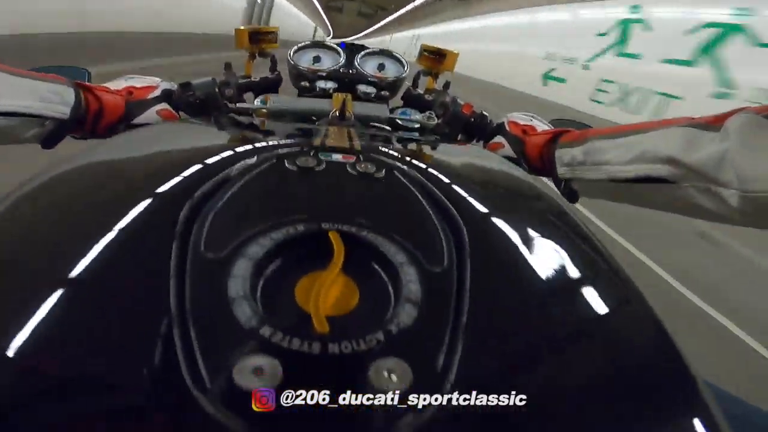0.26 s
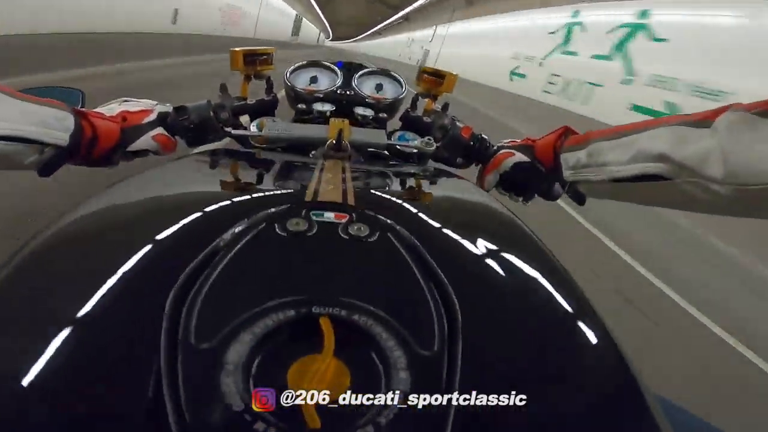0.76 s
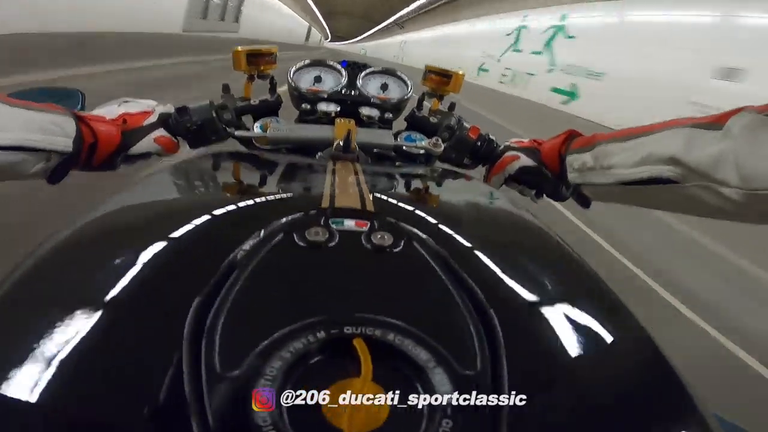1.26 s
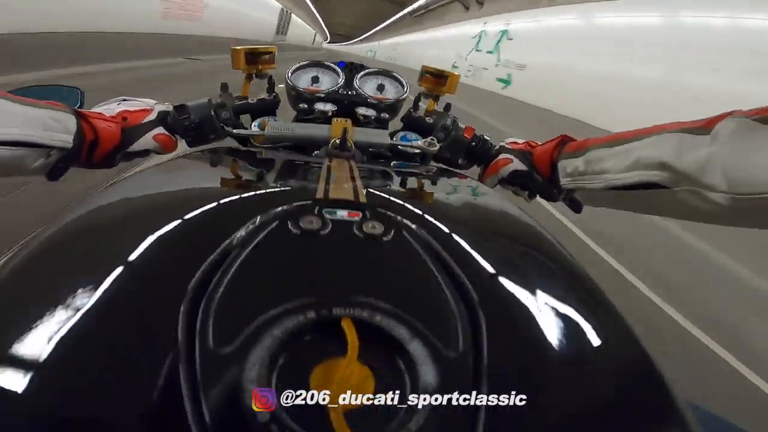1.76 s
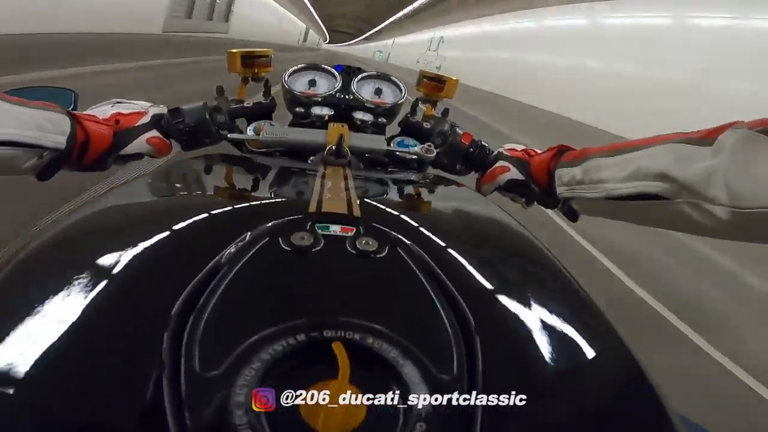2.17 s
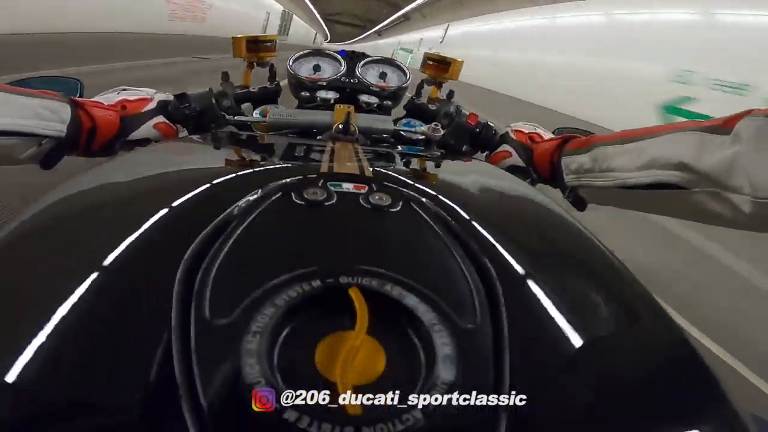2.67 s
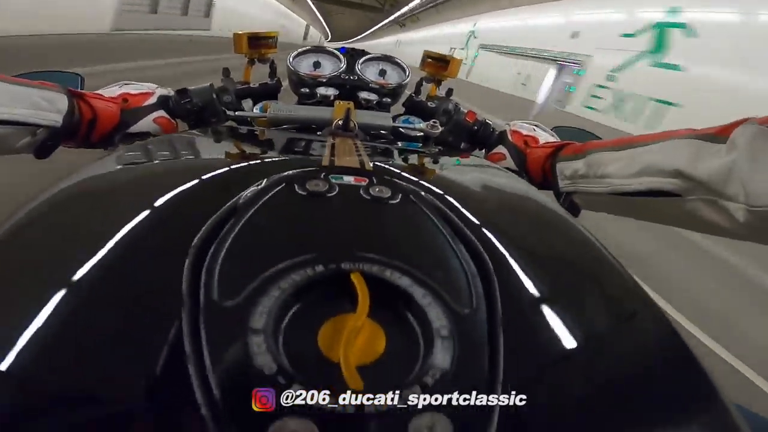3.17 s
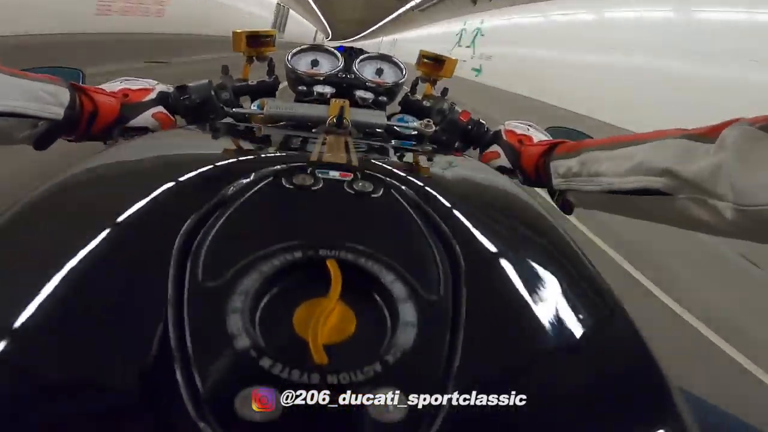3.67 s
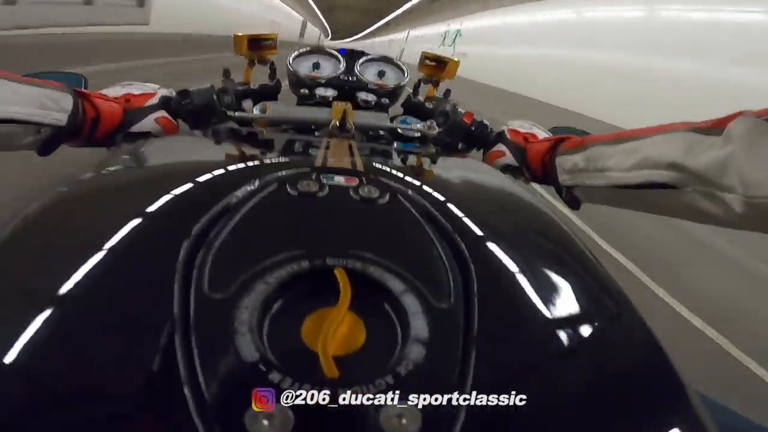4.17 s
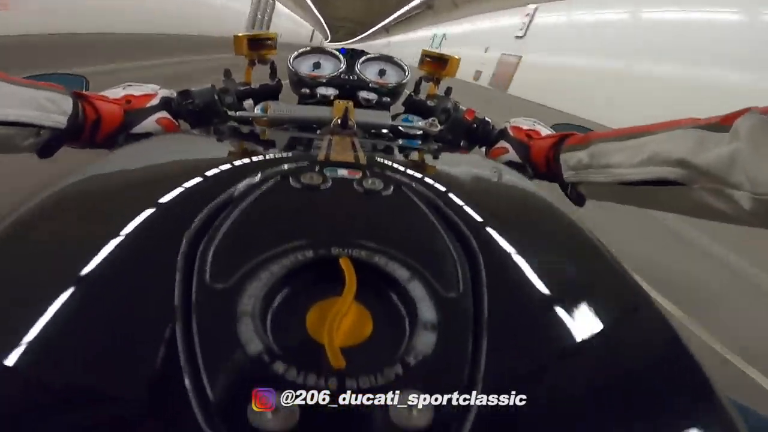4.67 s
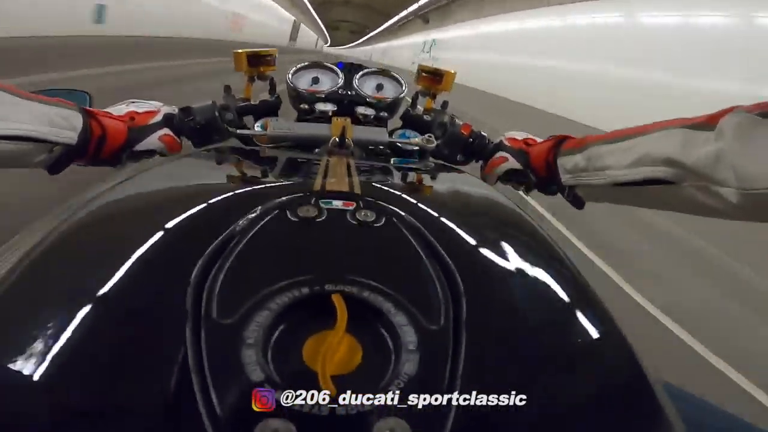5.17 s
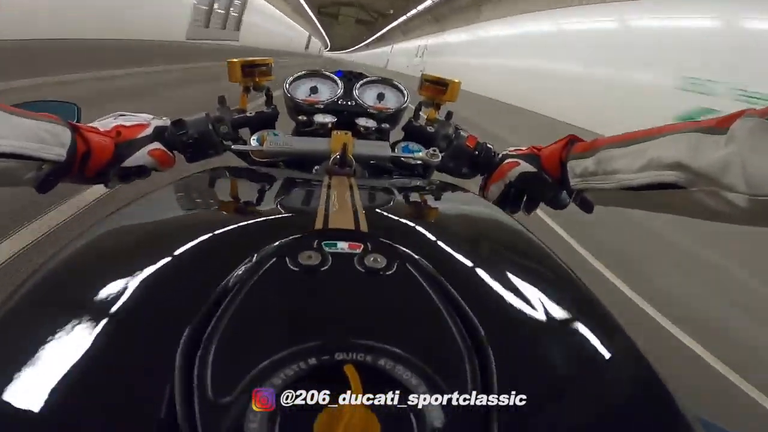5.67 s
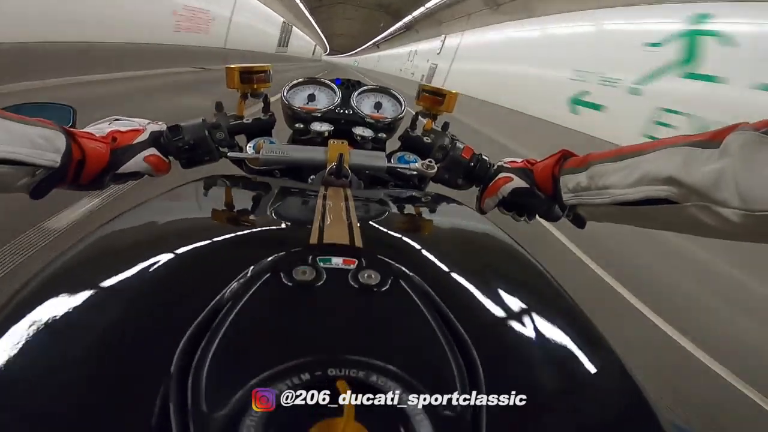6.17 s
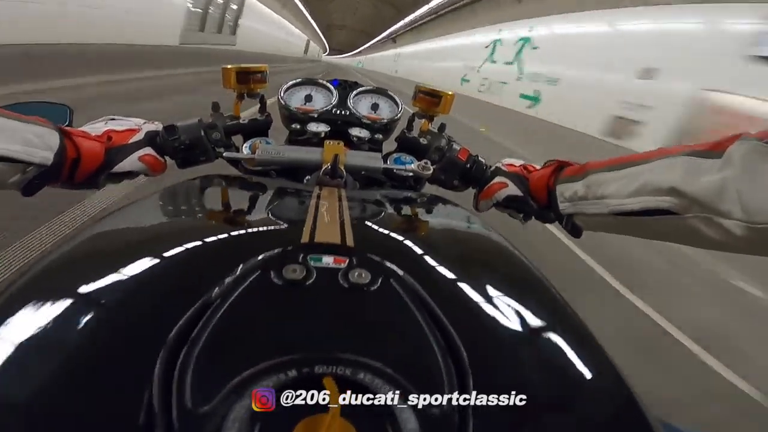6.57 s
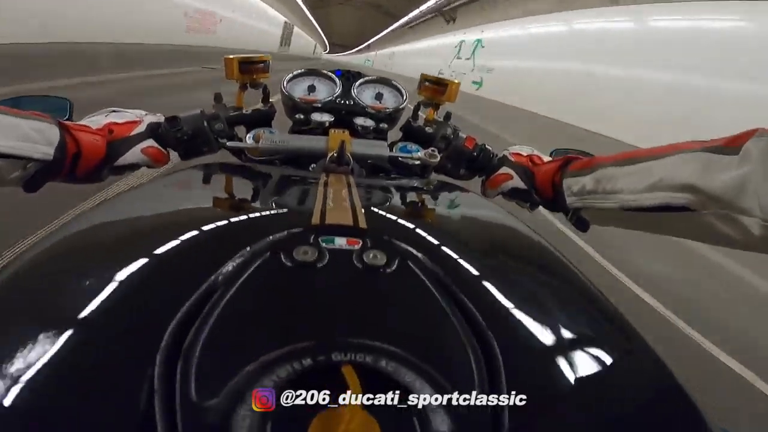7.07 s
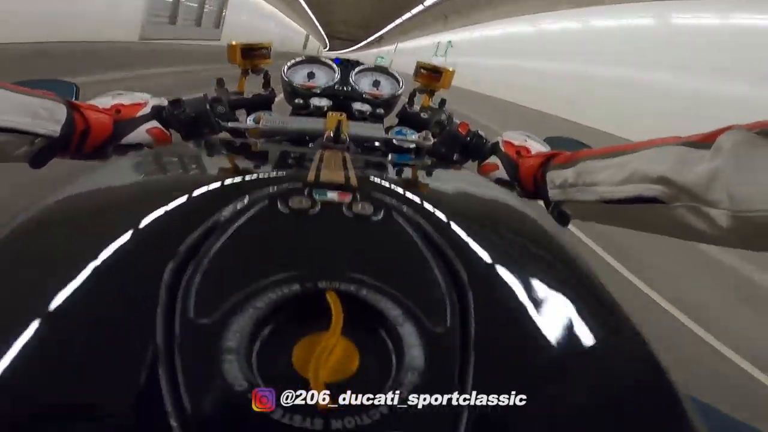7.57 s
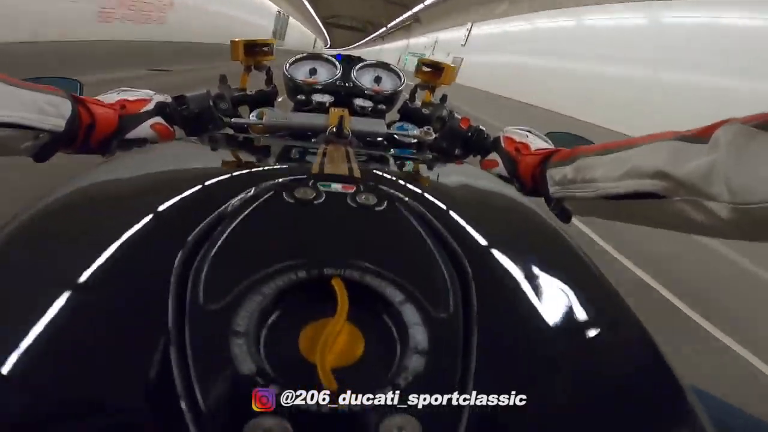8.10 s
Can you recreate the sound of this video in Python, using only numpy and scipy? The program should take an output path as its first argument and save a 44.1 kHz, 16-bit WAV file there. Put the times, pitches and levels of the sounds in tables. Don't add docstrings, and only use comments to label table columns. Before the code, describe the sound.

A twin-cylinder motorcycle runs through a hard-walled road tunnel, heard close from its tank through a muffled microphone. It starts already under throttle, barking and rising slightly, until about 0.55 s, when the throttle snaps shut and the sound turns darker, a hollow hum sinking gradually in pitch until 2.6 s. Then the throttle opens: rough, buzzing exhaust with crackling hard firings, especially 2.8-4 s, climbing about two semitones until 5.3 s, with a 200 Hz tunnel boom blooming from 3.3 s and fading. The throttle shuts; the bark chokes and the drone sags until 7.2 s. A final rasping pull climbs, booms again from 7.8 s and cuts off at 8.3 s still accelerating. Low lumpy wind gusts persist, strongest around 5.2-5.8 s. Walls make tones waver; dull loose-part ticks occur sporadically, sharpest near 3.2 and 7.1 s.

```python
import sys
import numpy as np
from scipy import signal
from scipy.fft import rfft, irfft
from scipy.io import wavfile
from scipy.ndimage import uniform_filter1d

SR = 44100
rng = np.random.default_rng(int(sys.argv[2]) if len(sys.argv) > 2 else 0)


def attenuation_scalar(level_db):
    decades = np.asarray(level_db, float) / 20
    return 10 ** decades


def digitize_waveform(pressure):
    field = np.atleast_2d(pressure).T
    bounded = np.clip(field, -1, 1)
    quanta = np.round(bounded * 32767).astype(np.int16)
    wavfile.write(sys.argv[1], SR, quanta)


N = 367794
T = np.arange(N) / SR

# start of opening in seconds, start of shutting in seconds.
THROTTLE_ROWS = [
    (-1, .54),
    (2.6, 5.31),
    (7.23, 9.5),
]
SECOND_FIRING_CYCLES, SECOND_FIRING_DB = .63, -5


def evened(x):
    return x / np.sqrt(np.mean(x ** 2) + 1e-20)


def curve(rows):
    s, value = np.transpose(rows)
    return np.interp(T, s, value)


def bumps(rows, width_s):
    return sum(db * np.exp(-((T - s) / width_s) ** 2) for s, db in rows)


def drift(hz):
    z = rfft(rng.standard_normal(N))
    return evened(irfft(z * np.exp(-(np.fft.rfftfreq(N, 1 / SR) / hz) ** 2), N))


def noise(points, patchy_db, size):
    hz = np.fft.rfftfreq(size, 1 / SR)
    a, b, patches = rng.standard_normal((N * 4 // size + 5, len(hz), 3)).T
    patches = uniform_filter1d(patches, size=8, axis=0)
    patches = evened(uniform_filter1d(patches, size=8, axis=1))
    f, db = np.transpose(points)
    colour_db = np.interp(np.log(hz + 1), np.log(f + 1), db, left=-90, right=-120)[:, None]
    z = (a + 1j * b) * attenuation_scalar(colour_db + patchy_db * patches)
    return evened(signal.istft(z, nperseg=size, noverlap=size * 3 // 4)[1][:N])


def butter(n, hz, kind):
    return signal.butter(n, hz, kind, fs=SR, output="sos")


def throttle():
    roll_on_s, snap_shut_s = .16, .08
    out = np.zeros(N)
    for on, shut in THROTTLE_ROWS:
        out += np.clip((T - on) / roll_on_s, 0, 1) * np.clip(1 - (T - shut) / snap_shut_s, 0, 1)
    return out


def cycle_rate():
    # time in seconds, rate in cycles per second.
    speed_rows = [(0, 55.6), (.49, 56.7), (.6, 56.2), (.65, 54.2), (.76, 55.4), (2.11, 50.65), (2.42, 49.9),
                  (3, 50.3), (3.92, 53.65), (4.71, 55.55), (5.06, 56.15), (5.32, 56.3), (5.39, 55),
                  (5.6, 54.9), (6.88, 50.3), (7.2, 49.95), (7.55, 50.25), (8.34, 52.95)]
    return curve(speed_rows)


def engine_load():
    # time in seconds, load from 0 to 1.
    load_rows = [(0, 0.87), (.5, 0.38), (.62, 0.14), (2.55, 0.14), (2.8, 0.58), (3.2, 0.78), (5.25, 0.26),
                 (5.42, 0), (7.2, 0.08), (7.45, 0.59), (8.34, 0.93)]
    lag_s = .18
    load = np.clip(curve(load_rows), 0, 1)
    return load, np.interp(T - lag_s, T, uniform_filter1d(load, size=SR // 4))


def swells(k):
    # time in seconds, order, level in dB.
    swell_rows = [(.1, 4, -8), (.5, 4, 6), (.5, 6, -1.5), (.72, 4, -4), (0.61, 6, -1), (1.05, 4, -6),
                  (1.7, 3, 3.5), (1.9, 5, 4), (1.91, 6, -2.5), (2.03, 4, -3.5), (2.34, 3, 5), (2.5, 6, -9),
                  (2.95, 6, -5), (2.3, 5, 3), (3.2, 3, 3), (3.4, 6, -7), (4.9, 8, 13), (5.15, 6, -1.5),
                  (5.3, 6, -8.5), (4.9, 5, -10), (5.7, 6, 3.5), (5.799, 4, -8.5), (5.7, 5, -6.5),
                  (9.4, 3, 4), (6.3, 4, 5.5), (6.55, 6, -10.5), (6.5, 5, -2.5), (6.75, 6, -4.5),
                  (8.4, 3, -1), (6.5, 6, -7), (7.3, 5, 6.5), (8.9, 6, -13), (7.8, 6, -5), (8, 8, -0.5),
                  (8.1, 5, 6), (0.26, 8, -4), (1.101, 5, 5), (7.9, 3, 5.5), (3.3, 4, -1), (3, 7, 5),
                  (3.25, 7, 8.5), (7.6, 7, 8.5), (7.8, 7, 11), (3.2, 9, 3), (7.55, 9, 4), (7.9, 9, 2.5),
                  (8.1, 9, 9), (1, 9, 5.5), (7.1, 9, 2.5), (3.2, 5, 4.5), (3.2, 8, 0.5), (3.4, 7, 2),
                  (2.83, 11, -8.5), (2.8, 11, -0.5), (7.8, 11, -4.5), (3.9, 10, 7), (5.7, 10, 7),
                  (2.35, 8, 2.5), (1.6, 6, -1)]
    # time in seconds, order, level in dB.
    lift_rows = [(2.5, 11, -9.5), (7.05, 11, -7), (7.3, 11, -7.5), (3.4, 14, -14), (2.8, 15, -10),
                 (2.8, 19, -4.5), (2.8, 21, -10), (7.6, 21, -3.5), (2.6, 12, 1.5), (.8, 2, 6.5),
                 (3.9, 1, 4), (4.3, 1, 5), (2.9, 1, -4), (5.6, 1, -3), (7, 1, -4.5), (4.6, 13, -9),
                 (2.8, 13, -5.5), (3.4, 16, -8), (4.8, 16, -5), (0.093, 15, 7), (0.32, 16, 4.5),
                 (.1, 17, 4), (.1, 7, -6), (.4, 9, -7), (3.3, 7, 3), (3.7, 7, 6), (.1, 19, -5),
                 (.4, 19, -7), (.4, 18, 4), (4, 18, 4), (4.3, 19, -1), (4.6, 16, 4), (5.4, 13, -3),
                 (4.3, 14, -3), (4, 14, 3.5), (3.1, 23, 7.5), (3.4, 23, 8), (4.3, 23, 7), (7.9, 23, 8),
                 (4.9, 21, 5), (5, 20, 4), (7.3, 20, 6.5), (7.6, 12, 4.5), (8, 9, -5), (5.5, 9, 3),
                 (2.55, 3, -2), (3.5, 4, 3.5), (3.72, 4, 5), (3.9, 4, 2), (.64, 4, 4), (7.15, 3, -3),
                 (6.35, 6, 2), (3.75, 6, 1), (2.4, 5, 1.5), (5.9, 5, -2.5), (8, 4, 1), (8.2, 4, 3),
                 (7.9, 8, 1), (1.3, 6, 1.5), (.85, 6, 1.5)]
    rows = [(s, db) for s, multiple, db in swell_rows + lift_rows if round(multiple) == k]
    return bumps(rows, width_s=.1)


def order(turns, k, wobble_db, wobble_rad):
    k = round(k)
    place, db = SECOND_FIRING_CYCLES, SECOND_FIRING_DB
    if k > 8:
        place, db = .65, -4
    lead_cycles = .045
    phase = np.angle(1 + attenuation_scalar(db) * np.exp(-2j * np.pi * k * place))
    phase += 2 * np.pi * lead_cycles * max(k - 9, 0)
    phase += np.pi / 2 if 5 <= k <= 7 else .25
    phase += .15 * rng.standard_normal()
    level = np.sqrt(2) * attenuation_scalar(wobble_db * drift(hz=8.8))
    return level * np.cos(2 * np.pi * k * turns + phase + wobble_rad * drift(hz=5.9))


def lope(turns, hz, load):
    # order, level in dB throttle shut, level in dB throttle open.
    lope_rows = [(1, -34, -26.5), (2, -37.5, -26.5)]
    out = np.zeros(N)
    for k, shut_db, open_db in lope_rows:
        level_db = shut_db + load * (open_db - shut_db) + swells(k) + .5 * (hz - 51.5)
        out += attenuation_scalar(level_db) * order(turns - .08, k, .98, .16)
    return out


def thud(turns, hz):
    # order, level in dB throttle shut, level in dB throttle open, lag in cycles.
    thud_rows = [(3, -26, -33, .08), (4, -27, -36, .045), (5, -31.5, -31.5, 0), (6, -30.5, -29.5, 0),
                 (8, -43, -31.5, .012)]
    # centre in Hz, width in Hz, lift in dB throttle shut, lift in dB open.
    tunnel_rows = [(149.6, 1.2, -6, 4), (152.6, 1.7, 7.5, 2), (200, 5.2, 8, 21), (203.3, 1.8, -1, 4),
                   (299.5, 3.8, -7, -8), (312, 10, 5.5, 1), (164, 3, 2, -1), (226, 5, 4, 12),
                   (251, 4, -6, -4), (268, 5, 7, 3), (282, 4, 1, 2), (339, 3.5, 1, 6), (402, 4.5, 5, 9),
                   (444, 6, 3, 1)]
    # time in seconds, level in dB.
    recess_rows = [(.68, -0.5), (.93, 0), (1.08, -4), (1.44, -2.5), (1.62, -1), (2.55, -1), (4.56, -1),
                   (4.96, -19.5), (5.5, 1), (6.22, -1.5), (6.57, 1.5), (7.2, 1)]
    edge, recess_s, wall_db = 3, .12, .6
    out, opened = np.zeros(N), throttle()
    for k, shut_db, open_db, lag in thud_rows:
        k = round(k)
        lift_db = np.zeros(N)
        for peak_hz, width_hz, low_db, high_db in tunnel_rows:
            near = np.exp(-abs((k * hz - peak_hz) / width_hz) ** edge)
            lift_db += (low_db + opened * (high_db - low_db)) * near
        sway_db = wall_db * drift(hz=14.0) + bumps(recess_rows, recess_s)
        sway_db = attenuation_scalar(-np.maximum(lift_db, 0) / 2) * sway_db + swells(k)
        level_db = shut_db + opened * (open_db - shut_db) + lift_db + sway_db
        out += attenuation_scalar(level_db) * order(turns - lag, k, .6, .12)
    return out


def bark_level_db(hz, load):
    shut_db, open_db, load_db, coast_db_per_hz = -39, -33.5, 7, .8
    gulp_db, gulp_s = -7, .17
    opened = throttle()
    gulp = sum(np.exp(-((T - shut - gulp_s) / gulp_s) ** 2) for on, shut in THROTTLE_ROWS)
    level_db = shut_db + opened * (open_db - shut_db + load_db * load) + gulp_db * gulp
    return level_db + coast_db_per_hz * (1 - opened) * (hz - hz.mean())


def bark(turns, hz, load, late_load):
    # level in dB throttle shut, level in dB throttle open.
    bark_rows = [(-5, -14), (0, -14), (-2, -27.5), (-2.5, -1.5), (-2.5, -0.5), (-12, -14.5), (-6.5, -16.5),
                 (-15, -18), (-19, -14.5), (-15.5, -13), (-17, -22), (-18, -16.5), (-21, -12.5),
                 (-23, -14.5), (-23.5, -19), (-24, -21), (-29.5, -31), (-27, -24), (-23, -35), (-29, -35),
                 (-29.5, -21.5)]
    # centre in Hz, width in Hz, lift in dB.
    lift_rows = [(526, 19, -10.5), (690, 17, 0.5), (757, 51, 7.5), (954, 30, 10.5), (1124, 20, 6.5)]
    bloom_db, coast_top_db = -11.5, -5
    out, opened = np.zeros(N), throttle()
    firing_db = bark_level_db(hz, load) + .6 * drift(hz=40.)
    for k, (shut_db, open_db) in zip([7, *range(9, 29)], bark_rows):
        lift = sum(db * np.exp(-((k * hz - peak_hz) / width_hz) ** 2) for peak_hz, width_hz, db in lift_rows)
        pipe_db = load * lift
        if k > 12:
            pipe_db += bloom_db * np.maximum(load - late_load, 0) + coast_top_db * (1 - opened)
        level_db = firing_db + shut_db + load * (open_db - shut_db) + pipe_db + swells(k)
        out += attenuation_scalar(level_db) * order(turns - .012, k, .05 * k, .0007 * k * k)
    return out


def puffs(turns, second_db, fade_cycles, spread_db):
    strength = attenuation_scalar(spread_db * rng.standard_normal((500, 2)))
    out = np.zeros(N)
    for k, (place, db) in enumerate([(0, 0), (SECOND_FIRING_CYCLES, second_db)]):
        u = turns + 1.04 - place
        out += attenuation_scalar(db) * strength[u.astype(int), k] * np.exp(-(u % 1) / fade_cycles)
    return uniform_filter1d(out, size=150)


def roar(turns, hz, load, hiss_db):
    # frequency in Hz, density in dB per Hz.
    roar_rows = [(88, -41), (150, 2), (253, -13), (315, -4), (371, -9.5), (609, -15), (802, -16),
                 (1430, -24.5), (4000, -46), (5200, -82.5), (8800, -120)]
    gate = .9 - .25 * load + (.3 + .6 * load) * puffs(turns, -3, .11, 1.6)
    level_db = -27.0 + .26 * (hiss_db + 50.0) + .21 * load
    out = attenuation_scalar(level_db) * noise(roar_rows, 1.6, size=1024) * gate
    rasp = .51 * (load - .3) + .073 * (1 - throttle()) * (hz - 53.5)
    return out + rasp * signal.sosfiltfilt(butter(2, (756, 1490), "band"), out)


def flares():
    # time in seconds, level in dB.
    flare_rows = [(.0702, 0.5), (0.1222, 1), (0.1964, -17), (0.249, 4), (0.4246, 7), (2.8225, 0),
                  (2.8435, 4.5), (2.8844, 4), (3.021, 2), (3.0642, 5), (3.1224, 4), (3.142, 4), (3.162, 0),
                  (3.181, 4), (3.204, 7), (3.2241, 6), (3.259, 2), (3.375, 5), (3.4326, 1), (3.5082, 0),
                  (3.5483, -1.5), (3.5865, -6), (3.6244, -2), (3.777, 4), (3.8108, 2), (3.8686, 9),
                  (3.9806, -1.5), (4.018, 1.5), (4.4577, -1.5), (4.7292, -2), (5.0697, 3), (7.6023, 4),
                  (7.683, 0.5), (7.7423, 0), (7.7814, 0), (7.821, 0.5), (7.8565, -0.5), (7.919, -1),
                  (7.995, -8), (8.036, 6), (8.0906, 6), (8.1472, 4), (8.186, 1.5), (8.2112, -1),
                  (8.2224, 0), (8.2825, -7), (8.3199, -2)]
    fade_s = .0028
    out = np.zeros(N)
    for s, db in flare_rows:
        out[round(s * SR)] = attenuation_scalar(db - .5)
    out = signal.oaconvolve(out, np.exp(-np.arange(1000) / SR / fade_s))[:N]
    return uniform_filter1d(uniform_filter1d(out, size=60), size=60)


def hiss(turns, load, hiss_db):
    # frequency in Hz, density in dB per Hz.
    hiss_rows = [(700, -28.5), (1200, -2), (1600, -11.5), (1900, -9), (2350, -12.5), (2800, -15.5),
                 (3600, -18.5), (5000, -25.5), (6400, -32), (8000, -42), (10000, -59), (12500, -66.5),
                 (14500, -77.5)]
    gate = 1 - .5 * load + 1.05 * load * puffs(turns - .04, 10, .16, 1.6)
    gate /= np.sqrt(uniform_filter1d(gate ** 2, size=4000))
    jet = noise(hiss_rows, .65, size=256)
    crackle = jet + .8 * signal.sosfilt(butter(2, 3800, "high"), jet)
    return attenuation_scalar(hiss_db + 4.5) * (jet * gate + crackle * flares())


def panels(x):
    # centre in Hz, width in Hz, share throttle shut, share throttle open.
    panel_rows = [(1373, 51, 0.53, 0.092), (2280, 80, .3, 0.73), (2400, 44, 0.93, .3),
                  (3010, 140, 0.48, 0.43), (3660, 64, .1, 0.54)]
    out, opened = x.copy(), throttle()
    for hz, width_hz, shut, wide in panel_rows:
        out += (shut + opened * (wide - shut)) * signal.lfilter(*signal.iirpeak(hz, hz / width_hz, SR), x)
    return out


def engine():
    hz = cycle_rate()
    turns = .75 + np.cumsum(hz) / SR
    load, late_load = engine_load()
    hiss_db = -53 + .42 * (hz - hz.min()) + 7.5 * late_load
    tone = lope(turns, hz, load) + thud(turns, hz) + bark(turns, hz, load, late_load)
    return tone + panels(roar(turns, hz, load, hiss_db) + hiss(turns, load, hiss_db))


def microphone_hiss():
    # frequency in Hz, density in dB per Hz.
    air_rows = [(5000, -3), (8000, 0), (11000, -7), (13000, -22.5)]
    return attenuation_scalar(-81.5) * noise(air_rows, .3, size=256)


def wind():
    # frequency in Hz, density in dB per Hz.
    wind_rows = [(14, -44.5), (26, -15.5), (40, -5.5), (60, -1.5), (90, -1), (130, -5.5), (200, -11),
                 (400, -23)]
    # time in seconds, level in dB.
    gust_rows = [(.3, 0), (.84, 0.5), (1, 1.5), (1.85, 3), (2.11, -2.5), (2.35, -1.5), (2.93, 5.5),
                 (3.14, -3), (3.38, -6), (3.52, 1), (3.8, 0), (4.28, 1), (4.68, 3.5), (4.97, 4), (5.18, 8),
                 (5.78, 7.5), (6.21, 3), (6.53, 1.5), (6.68, 1.5), (6.95, 3), (7.39, 4), (7.88, 3),
                 (8.1, 1.5), (8.3, 2)]
    shut_db, open_db, gust_s = -24, -26, .057
    level_db = shut_db + throttle() * (open_db - shut_db) + bumps(gust_rows, gust_s)
    level_db += 1.2 * drift(hz=3.0) + .2 * drift(hz=18.0)
    return attenuation_scalar(level_db) * noise(wind_rows, .43, size=4096)


def ticks():
    # time in seconds, peak in dB.
    tick_rows = [(2.822, -29), (2.8445, -31), (3.2045, -22), (3.225, -27), (7.0884, -17), (7.4227, -29),
                 (1.912, -27), (1.123, -27), (6.047, -30), (6.237, -30), (6.6583, -32), (8.0385, -25),
                 (4.0185, -27)]
    out, t = np.zeros(N + 400), np.arange(400) / SR
    dull = np.vstack([butter(1, 500, "high"), butter(2, 1400, "low"), butter(3, 4800, "low")])
    for s, db in tick_rows:
        snap = 3.5 * (t == 0) + rng.standard_normal(400)
        snap = signal.sosfilt(dull, snap * attenuation_scalar(-60 * t / .006))
        out[round(s * SR):][:400] += attenuation_scalar(db - .5) * snap / abs(snap).max()
    return out[:N]


def boom():
    # start in seconds, length in seconds, level in dB.
    boom_rows = [
        (3.27, 1.6, -22),
        (7.836, 0.49, -21.5),
    ]
    boom_hz, fade_db_per_s, waver_db = 200.4, -9, 2
    out = np.zeros(N)
    for start, length, db in boom_rows:
        fade = np.clip((T - start) / .061, 0, 1) * np.clip((start + length - T) / .088, 0, 1)
        level_db = db + fade_db_per_s * np.maximum(T - start, 0) + waver_db * drift(hz=4.4)
        wave = np.sin(2 * np.pi * boom_hz * T + .19 * drift(hz=13.0))
        out += np.sqrt(2) * attenuation_scalar(level_db) * fade * wave
    return out


def scene():
    mix = engine() + microphone_hiss() + wind() + ticks() + boom()
    return (mix * np.clip(.3 + T / .001, 0, 1))[None]


def low_pass(x):
    return signal.sosfilt(signal.butter(12, 13900, fs=SR, output="sos"), x)


def record(dry):
    power_db = 10 * np.log10(uniform_filter1d(dry ** 2, size=1500, axis=1) + 1e-9)
    ridden = dry * attenuation_scalar(-.25 * np.maximum(power_db + 18.5, 0))
    return low_pass(ridden)


dry = scene()
out = record(dry)
digitize_waveform(out)
```